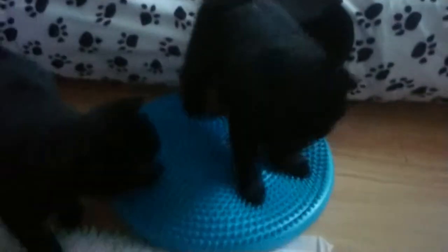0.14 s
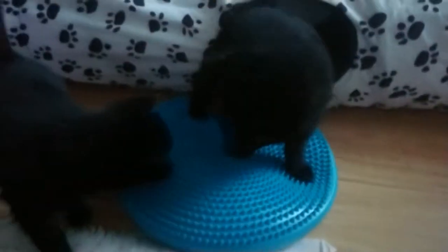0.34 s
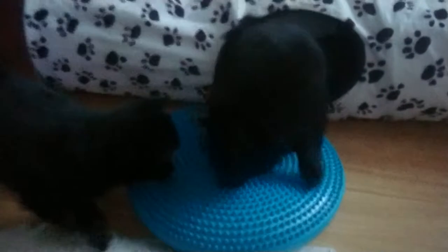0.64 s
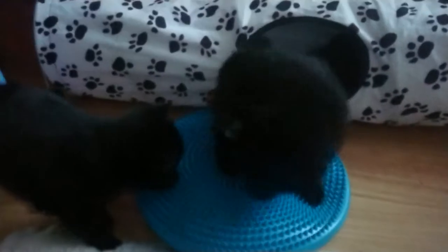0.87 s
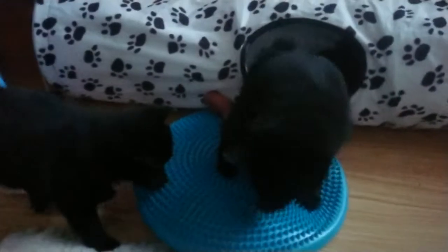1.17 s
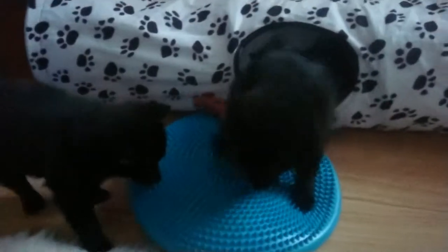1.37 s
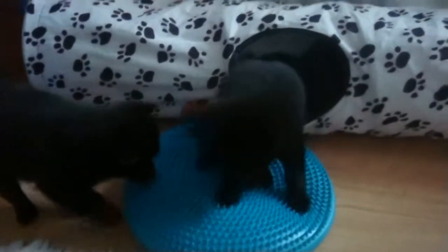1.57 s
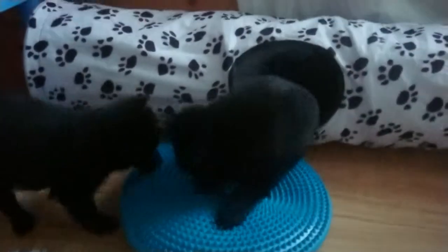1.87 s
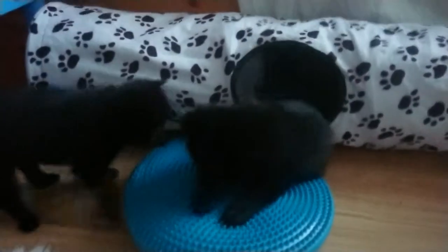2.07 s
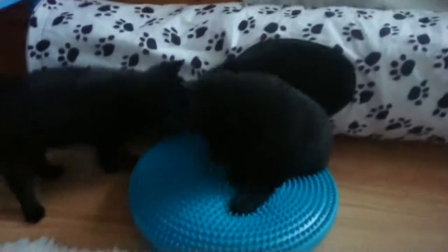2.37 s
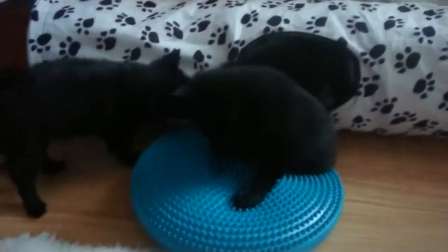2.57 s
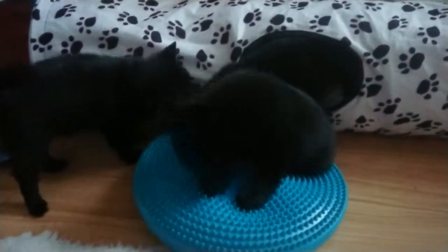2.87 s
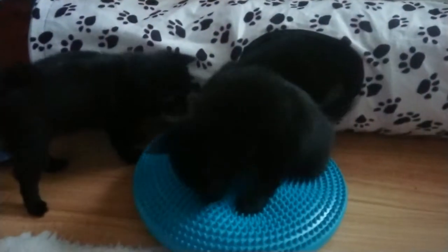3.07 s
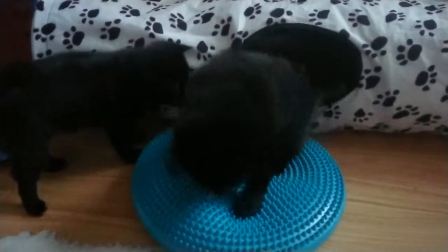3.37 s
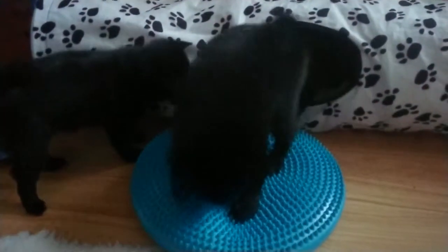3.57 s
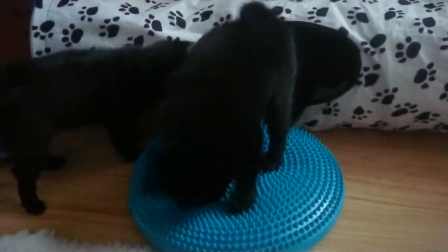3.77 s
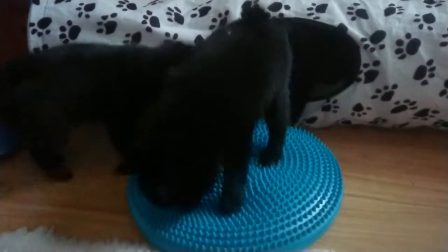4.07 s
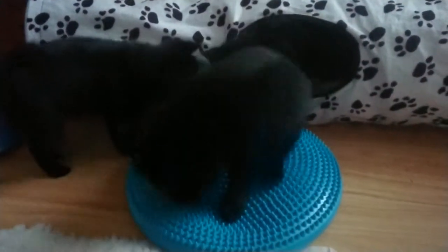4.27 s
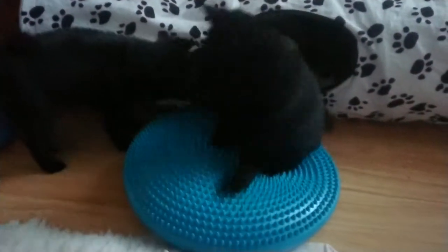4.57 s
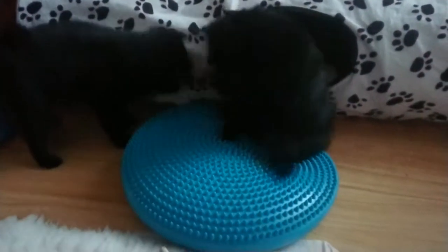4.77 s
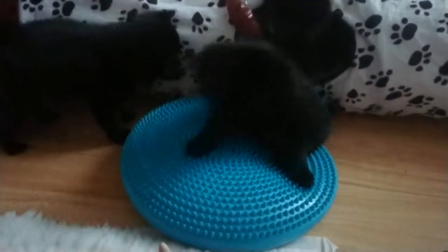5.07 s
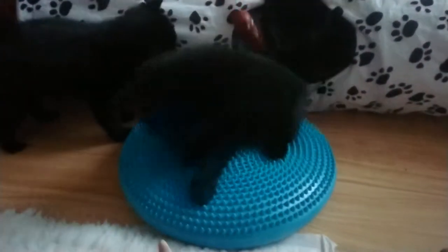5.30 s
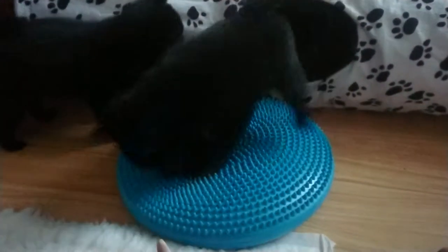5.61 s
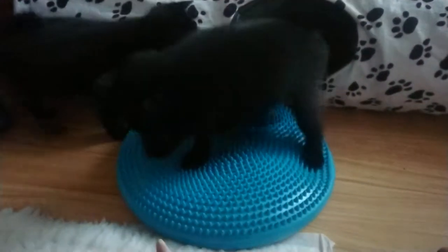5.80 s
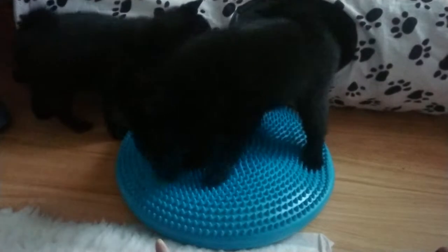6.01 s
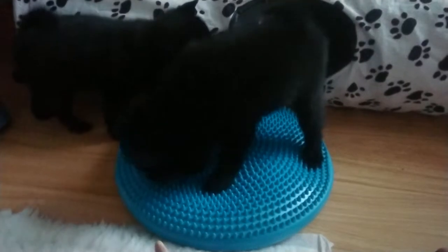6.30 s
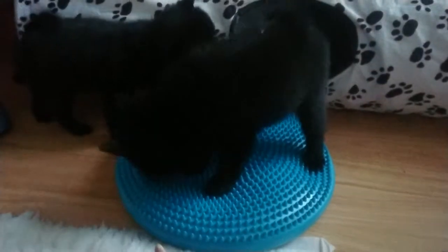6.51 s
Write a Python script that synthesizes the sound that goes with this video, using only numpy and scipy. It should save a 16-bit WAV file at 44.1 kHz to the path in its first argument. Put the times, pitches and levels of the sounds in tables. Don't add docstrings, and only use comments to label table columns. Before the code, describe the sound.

Small pets clamber over a studded rubber air cushion beside a crinkly fabric tunnel. Thin cloth rustles and crackles in uneven swells, with claw ticks and sharp crease snaps. Soft low bumps cluster between about one and two and a half seconds, then become sparser. A few tiny snuffles and a low wooden floor boom follow. Small, fairly dry room, close stereo phone microphone, quiet throughout.

```python
import sys
import numpy as np
from scipy import signal
from scipy.fft import rfft, irfft
from scipy.io import wavfile

SR = 44100
rng = np.random.default_rng(int(sys.argv[2]) if len(sys.argv) > 2 else 0)


def put_to_file(sound):
    columns = np.atleast_2d(sound).T
    safe = np.clip(columns, -1, 1)
    whole_steps = np.round(safe * 32767)
    wavfile.write(sys.argv[1], SR, whole_steps.astype(np.int16))


def volts_from_decibels(level):
    exponent = np.asarray(level, float) / 20
    return 10 ** exponent


N = 293265

# (time of peak [s], peak [dB], pitch [Hz])
BUMPS = [(1.228, -34, 264), (1.243, -29.5, 276), (1.292, -32, 230), (1.303, -26, 250), (1.642, -31, 226),
         (1.662, -34, 232), (1.697, -34, 200), (1.708, -31, 210), (1.8, -29, 212), (1.812, -31.5, 230),
         (1.88, -27, 200), (1.885, -29, 195), (1.889, -28, 200), (1.914, -29.5, 205), (1.92, -33, 190),
         (1.946, -29.5, 260), (1.965, -29, 288), (2.212, -30.5, 262), (2.314, -23, 270), (2.321, -31, 170),
         (2.328, -33, 190), (2.369, -33, 170), (2.439, -33, 260), (2.363, -25.5, 230), (2.404, -22.5, 243),
         (2.428, -26, 236), (2.509, -28, 196), (3.032, -27, 250), (3.054, -26.5, 287), (3.072, -34, 170),
         (3.455, -32.5, 232), (3.507, -31.5, 267), (5.197, -34.5, 150), (5.554, -29, 285),
         (5.722, -31, 285), (5.741, -35, 145)]
# (time of peak [s], peak [dB], pitch [Hz])
WEAKER_BUMPS = [(1.318, -39, 200), (1.329, -38, 202), (1.687, -38, 240), (1.828, -41, 170), (1.84, -39, 270),
                (2.071, -37, 320), (2.086, -37, 390), (2.294, -35, 250), (2.546, -39, 170), (2.567, -39, 161),
                (3.014, -39, 260), (3.082, -35.5, 212), (3.374, -36.5, 250), (3.41, -36, 266),
                (3.698, -37.5, 212), (3.875, -40, 190), (5.12, -40, 330), (5.149, -38, 330), (5.535, -35.5, 312),
                (5.587, -39, 282), (5.628, -37.5, 160), (5.641, -35, 298), (5.649, -36, 280), (5.678, -41, 240),
                (5.706, -37, 257), (5.753, -36, 203), (5.765, -35, 220), (5.801, -40, 170), (6.222, -42, 170)]
LEAN_S = .12
ROOM_T60_S, ROOM_DB = 0.17, -6.5


def rms_one(x):
    return x / np.sqrt(np.mean(x ** 2) + 1e-20)


def in_time(rows):
    s, *columns = np.transpose(rows)
    return [np.interp(np.arange(N) / SR, s, c) for c in columns]


def colour(x, points):
    hz = np.maximum(np.arange(2049) * SR / 4096, 1)
    point_hz, point_db = np.transpose(points)
    log_gain = np.interp(np.log(hz), np.log(point_hz), point_db) * np.log(10) / 20
    cepstrum = irfft(log_gain)[:2048] * np.r_[1, 2 * np.ones(2047)]
    impulse = irfft(np.exp(rfft(cepstrum, 4096)))
    return signal.fftconvolve(x, impulse)[:N]


def drift(rate_hz):
    r = np.exp(-80 * np.pi * rate_hz / SR)
    white = rng.standard_normal(N // 40 + 2002)
    slow = signal.lfilter([1], [1, -2 * r, r * r], white)[2000:]
    return np.interp(np.arange(N) / 40, np.arange(len(slow)), rms_one(slow))


def ring(clicks, hz, t60):
    r, w = volts_from_decibels(-60 / (t60 * SR)), 2 * np.pi * hz / SR
    return signal.lfilter([0, np.sin(w)], [1, -2 * r * np.cos(w), r * r], clicks + 1e-18)


def fade(x, tau_s):
    r = np.exp(-1 / (tau_s * SR))
    return signal.lfilter([1 - r], [1, -r], x + 1e-18)


def below(x, hz):
    return signal.sosfiltfilt(signal.butter(3, hz, fs=SR, output="sos"), x)


def swells(rows):
    t = np.arange(N // 40 + 1) * 40 / SR
    s, rise_s, fall_s, peak_db = np.transpose(rows)[..., None]
    drop_db = 10 * np.maximum((s - t) / rise_s, (t - s) / fall_s)
    power = volts_from_decibels(2 * (peak_db - drop_db)).sum(0)
    return np.interp(np.arange(N) / SR, t, power) + 1e-12


def add(out, s, sound):
    i = round(s * SR)
    out[..., i:i + sound.shape[-1]] += sound[..., :N - i]


def room(x):
    t = np.arange(SR // 2) / SR
    tails = rng.standard_normal((2, len(t))) * volts_from_decibels(-60 * t / ROOM_T60_S) * (t > .002)
    tails /= np.sqrt(np.sum(tails ** 2, axis=1, keepdims=True))
    return x + volts_from_decibels(ROOM_DB) * signal.fftconvolve(x, tails, axes=1)[:, :N]


def ports(x):
    # (frequency [Hz], gain [dB])
    port_left = [(650, -14), (800, -3.5), (1050, -6.5), (2050, 0), (3600, -4.5), (4500, -1.5), (5750, 2.5),
                 (6150, 1), (6500, -2.5), (8200, -2.5), (10600, -4.5), (11700, -12.5), (14000, -8),
                 (15650, -14.5)]
    port_right = [(650, -15.6), (800, -8.4), (1000, -12.4), (2050, -0.3), (3800, -4.7), (5000, -1.2),
                  (5600, -5.0), (6050, -14.9), (6550, -7.2), (9400, -4.7), (11400, -7.2), (13500, 0.9),
                  (14300, -0.3), (15650, -10.2)]
    left = colour(x[0], [(250, -31)] + port_left)
    right = colour(x[1], [(250, -35)] + port_right)
    right = .3 * right + .7 * signal.lfilter(*signal.iirnotch(6060, 18, SR), right)
    return np.array([left, right])


def movement():
    # (time [s], level [dB], brightness [dB])
    stir_rows = [(0.0, -48.9, -1.7), (0.09, -56.9, -8.9), (0.44, -55.8, -5.4), (0.98, -52.8, -3.0),
                 (1.35, -56.9, -3.8), (1.7, -47.5, -0.5), (2.05, -47.8, 0.8), (2.45, -45.5, -0.0),
                 (2.6, -55.1, -0.1), (3.09, -70.5, -5.9), (3.5, -58.5, 1.3), (3.77, -53.5, -1.9),
                 (3.83, -71.4, -3.1), (4.55, -70.0, -6.4), (4.83, -59.5, -15.1), (5.5, -52.3, -0.2),
                 (5.85, -59.6, -1.7), (6.65, -64.7, -3.2)]
    # (time of peak [s], rise [s per 10 dB], fall [s per 10 dB], peak [dB])
    brush_rows = [(0.039, 0.013, 0.017, -54.2), (0.207, 0.059, 0.032, -45.4), (0.33, 0.161, 0.197, -59.1),
                  (0.54, 0.063, 0.083, -49.8), (1.59, 0.076, 0.043, -40.1), (1.699, 0.067, 0.449, -45.0),
                  (1.841, 0.017, 0.103, -46.9), (2.08, 0.035, 0.287, -42.6), (2.861, 0.087, 0.104, -44.4),
                  (3.008, 0.056, 0.03, -48.6), (3.113, 0.014, 0.027, -50.3), (3.125, 0.009, 0.035, -55.8),
                  (3.384, 0.087, 0.05, -43.4), (3.653, 0.291, 0.069, -49.5), (3.904, 0.049, 0.103, -49.6),
                  (4.23, 0.066, 0.608, -58.5), (4.291, 0.058, 0.012, -52.9), (4.343, .009, .012, -51),
                  (4.383, .006, .025, -49), (4.455, .02, .008, -48), (4.608, 0.024, 0.065, -51.9),
                  (4.679, 0.028, 0.079, -53.3), (4.758, 0.074, 0.061, -45.4), (4.9, 0.022, 0.029, -47.0),
                  (5.139, 0.157, 0.067, -37.2), (5.288, 0.066, 0.115, -46.1), (5.46, 0.035, 0.055, -44.6),
                  (5.592, 0.311, 0.031, -45.5), (5.68, 0.142, 0.088, -40.9), (6.051, 0.304, 0.071, -47.8),
                  (6.118, 0.035, 0.067, -45.5), (6.379, 0.048, 0.794, -55.0), (6.636, 0.015, 0.192, -52.3)]
    # (time of peak [s], rise [s per 10 dB],
    # fall [s per 10 dB], peak [dB])
    drag_rows = [(0.777, 0.065, 0.105, -43.4), (0.868, 0.086, 0.038, -44.7), (1.051, 0.09, 0.016, -55.0),
                 (1.11, 0.038, 0.04, -47.3), (1.248, 0.305, 0.049, -48.9), (1.506, 0.151, 0.042, -47.3),
                 (1.919, 0.235, 0.14, -45.2), (2.179, 0.033, 0.044, -39.7), (2.347, 0.167, 0.126, -40.9),
                 (2.508, 0.02, 0.035, -42.8), (2.645, 0.047, 0.135, -48.5), (3.206, 0.18, 0.289, -51.7),
                 (3.278, 0.011, 0.533, -51.2), (3.76, 0.045, 0.028, -51.6), (4.049, 0.095, 0.035, -53.9),
                 (4.432, 0.089, 0.037, -50.5), (5.858, 0.027, 0.034, -45.4), (5.981, 0.024, 0.039, -50.3),
                 (6.221, 0.026, 0.055, -43.9), (6.533, 0.179, 0.037, -55.5)]
    stir_db, stir_bright_db = in_time(stir_rows)
    stir, brush, heavy = volts_from_decibels(2 * stir_db), swells(brush_rows), swells(drag_rows)
    power = stir + brush + heavy
    level_db = 10 * np.log10(power)
    move_bright_db = -1.05
    bright_db = (stir * stir_bright_db + (brush + heavy) * move_bright_db) / power
    drag = stir * volts_from_decibels(2 * -11.4) + brush * volts_from_decibels(2 * -5.9) + heavy * volts_from_decibels(2 * -2)
    drag_db = 10 * np.log10(drag)
    body_db = drag_db - 11.6 + .03 * (drag_db - drag_db.mean())
    return level_db, bright_db, drag_db, body_db


def weight():
    # (time [s], boom level [dB])
    tread_rows = [(0.0, -58), (.3, -56), (.65, -60), (.89, -56), (1.11, -61), (1.31, -50.5), (1.6, -58),
                  (1.81, -51), (1.93, -52), (2.4, -58), (2.84, -59), (3.09, -54), (3.43, -50), (3.54, -52),
                  (3.89, -56), (3.97, -60), (4.2, -62), (5.2, -45.5), (5.52, -53), (5.67, -51), (5.74, -41),
                  (6.22, -54), (6.32, -56), (6.4, -60)]
    # (time [s], rumble level [dB])
    rub_rows = [(.42, -64), (6.52, -63), (.95, -62), (3.25, -59), (3.63, -59), (3.88, -61), (4.44, -62),
                (5.26, -58), (5.5, -59), (5.92, -57), (6.12, -59), (6.35, -62)]
    rest_db, move_db, slip_db = -72, -8.8, -27
    slips = swells([(s, .01, .08, db + slip_db) for s, db, _ in BUMPS + WEAKER_BUMPS])
    rubs = swells([(s, LEAN_S, LEAN_S, db) for s, db in rub_rows])
    drags = volts_from_decibels(2 * (movement()[2] + move_db))
    rumble_power = volts_from_decibels(2 * rest_db) + drags + slips + rubs
    boom_power = swells([(s, .06, .06, db) for s, db in tread_rows]) + volts_from_decibels(2 * -75.)
    return 10 * np.log10(rumble_power), 10 * np.log10(boom_power)


def leaning(white):
    # (time [s], rumble level [dB])
    lean_rows = [(.03, -61), (.33, -58), (.46, -60), (1.42, -61), (2.65, -59), (3.97, -65), (4.22, -61),
                 (5.45, -60)]
    power = swells([(s, LEAN_S, LEAN_S, db) for s, db in lean_rows])
    return np.sqrt(power) * rms_one(ring(white, 150, .03))


def rumble():
    # (frequency [Hz], density [dB per Hz])
    rumble_colour = [(59, -31), (100, -1), (184, -3.5), (242, -3), (356, -3.5), (556, -7.5), (650, -20.5),
                     (840, -30), (1430, -120)]
    # (frequency [Hz], level [dB], T60 [s])
    low_modes = [
        (52.2, -68, 0.79),
        (80.6, 0.5, 0.24),
    ]
    rumble_db, boom_db = weight()
    white = rng.standard_normal((3, 2, N))
    noise = rms_one(np.array([colour(w, rumble_colour) for w in white[0]]))
    lumps = volts_from_decibels(rumble_db + 3.16 * drift(15)) * noise
    hum, boom = (volts_from_decibels(db) * rms_one(ring(w, hz, t60)) for w, (hz, db, t60) in zip(white[1:], low_modes))
    mid, side = lumps + leaning(white[0]) + hum + volts_from_decibels(boom_db) * boom
    return mid + .27 * side * np.array([[1], [-1]])


def knock():
    # (time [s], peak [dB])
    contact = [(6.206, -34.5)]
    # (frequency [Hz], level [dB], T60 [s])
    board_modes = [(170, -8.5, .1), (900, 1.5, 0.035), (807, -8, 0.12), (1260, -10, 0.034),
                   (1700, -14, 0.049), (2196, -8, .08), (2980, -20, 0.045)]
    click = np.zeros(N)
    s, peak_db = contact[0]
    click[round(s * SR)] = -volts_from_decibels(peak_db)
    return sum(volts_from_decibels(db) * ring(click, hz, t60) for hz, db, t60 in board_modes)


def snuffles():
    # (start [s], length [s], resonance at start [Hz], resonance at end [Hz],
    # level [dB])
    puffs = [(3.104, .06, 2100, 2100, -58), (3.155, .075, 2500, 2400, -56), (3.899, .075, 2050, 1900, -48),
             (4.035, 0.07, 1300, 1130, -58), (5.753, .065, 1950, 1550, -46.5),
             (5.84, 0.061, 1730, 1448, -45.5), (5.85, .035, 2410, 2260, -53)]
    out = np.zeros((2, N))
    for s, length, start_hz, end_hz, level_db in puffs:
        t = np.arange(round(length * SR)) / SR
        white = rng.standard_normal((2, 3, 4000))
        shared = white[:, :2] + 0.46 * white[:, 2:]
        slow = signal.lfilter([1], [1, -2 * .97, .97 ** 2], shared)[..., -len(t):]
        phase = 2 * np.pi * np.cumsum(start_hz + (end_hz - start_hz) * t / length) / SR
        air = rms_one(slow[0] * np.cos(phase) + slow[1] * np.sin(phase))
        flutter = 1 + .6 * np.cos(2 * np.pi * 92 * (t - .003))
        envelope = np.minimum(t / 0.0032, 1) * (1 - t / length) ** 0.76
        add(out, s, volts_from_decibels(level_db + 5) * air * flutter * envelope)
    return room(out)


def claws():
    # (time [s], peak [dB])
    catches = [(.0318, -40), (.1486, -41), (.262, -44), (.605, -43), (.7547, -32), (.851, -28), (1.04, -33),
               (1.058, -38), (1.352, -40), (1.485, -33), (1.503, -33), (1.65, -35), (1.9425, -34),
               (2.318, -32), (2.858, -38), (3.0525, -42), (3.08, -43), (3.41, -35), (3.534, -41),
               (3.9005, -33), (4.916, -40), (4.949, -40), (4.977, -40)]
    clicks = np.zeros(N)
    s, db = np.transpose(catches)
    clicks[(s * SR).astype(int)] = volts_from_decibels(db)
    return room(ring(clicks, 2000, .009) * np.ones((2, 1)))


def flicks():
    # (time [s], peak [dB], pitch [Hz])
    thin_edges = [(0.2123, -38, 13700), (0.2876, -42, 13500), (0.6049, -41, 13200), (0.7536, -36, 12700),
                  (0.8823, -34, 13400), (1.5343, -37, 14200), (1.5548, -32, 14100), (1.5717, -31, 13400),
                  (1.6181, -26, 14100), (1.7389, -30, 13800), (1.8606, -31, 13800), (1.881, -27, 14200),
                  (2.0162, -29, 13900), (2.0681, -32, 13800), (2.0921, -29, 14700), (2.1046, -29, 13700),
                  (2.4861, -34, 13500), (2.5729, -36, 13900), (2.769, -37, 14400), (2.832, -34, 13800),
                  (3.4355, -34, 13800), (3.5074, -38, 13600), (3.5203, -35, 14000), (3.5373, -35, 13900),
                  (3.5627, -33, 13900), (3.6166, -33, 14000), (3.6234, -36, 14100), (3.7288, -39, 12300),
                  (3.8446, -34, 13800), (3.8736, -24, 13000), (3.8816, -25, 13900), (3.8879, -35, 13100),
                  (3.9549, -40, 13800), (4.0592, -38, 13600), (4.2881, -32, 13600), (4.3924, -39, 13700),
                  (4.4212, -31, 14000), (4.4354, -38, 14900), (4.7086, -34, 13500), (4.745, -36, 13900),
                  (4.8907, -38, 13700), (4.955, -40, 14300), (5.0798, -33, 14800), (5.2359, -38, 14200),
                  (5.6235, -31, 13600), (5.667, -30, 13800), (5.833, -37, 13900), (5.9627, -39, 13800),
                  (6.123, -29, 14300), (6.2164, -35, 13700), (6.2224, -36, 13800), (6.6227, -41, 13800)]
    # (time [s], peak [dB], pitch [Hz])
    broad_edges = [(.0594, -44, 4500), (.4055, -45, 3500), (.4594, -41, 4200), (.5531, -42, 8000),
                   (1.68, -33, 6000), (1.739, -35, 10000), (1.755, -36, 5800), (1.838, -33, 5800),
                   (2.135, -35, 5800), (3.1117, -40, 5900), (3.6415, -36, 7770), (3.8745, -30, 5570),
                   (3.8884, -35, 5610), (4.5629, -44, 7760), (4.895, -38, 7500)]
    releases = thin_edges + broad_edges
    out, t = np.zeros((2, N)), np.arange(400) / SR
    width = .15
    for s, peak_db, hz in releases:
        burst = rng.standard_normal((2, len(t))) * np.exp(-t / .0007)
        band = [hz * (1 - width), min(hz * (1 + width), .45 * SR)]
        spit = signal.sosfilt(signal.butter(1, band, "band", fs=SR, output="sos"), burst)
        add(out, s, volts_from_decibels(peak_db + 10) * spit / np.abs(spit).max())
    return ports(room(out))


def bumps():
    # (frequency [Hz], level [dB], T60 [s])
    cushion_modes = [(81.5, -10, 0.087), (147.2, -9.5, 0.1), (250, -19.5, 0.063), (364.7, -15, 0.21)]
    # (frequency [Hz], level [dB], T60 [s])
    shell = (790, -23.5, 0.043)
    out, taps = np.zeros(N), np.zeros(N)
    slips = BUMPS + WEAKER_BUMPS
    for s, peak_db, hz in slips:
        turns = np.arange(-300, 1200) / SR * hz
        late = np.maximum(turns, 0)
        swing = turns - 0.37 * late ** 2 / (1 + late) - .15 * np.minimum(turns, 0) ** 2
        shape = np.where(turns < 0, np.exp(-(turns / .5) ** 2), np.exp(-(late / .85) ** 1.3))
        add(out, s - 300 / SR, -volts_from_decibels(peak_db) * np.cos(2 * np.pi * swing) * shape)
        taps[round((s - .002) * SR)] = volts_from_decibels(peak_db + shell[1])
    out -= below(out, 64)
    rung = sum(volts_from_decibels(db - 38) * ring(out, hz, t60) for hz, db, t60 in cushion_modes)
    return out + rung + ring(taps, shell[0], shell[2])


def snaps():
    # (time [s], peak [dB], brightness [dB])
    snapping_folds = [(0.0316, -27.5, -22), (0.1271, -36, -14), (0.4603, -37, -21), (0.5273, -29, -9),
                      (0.553, -34, -16), (0.85, -18.5, -15), (0.8654, -27, -16), (1.6788, -31, -30),
                      (1.8361, -30, -20), (3.3732, -29, -5.5), (3.6427, -25, -15), (3.8452, -42, -5),
                      (3.8674, -37, -8), (3.8722, -21, -24), (3.889, -31, -24), (4.2416, -33, -18),
                      (4.2712, -32, -22), (4.289, -33, -16), (4.4362, -33, -17), (4.5617, -52, -3),
                      (5.3852, -41, 4), (5.4634, -23, -10), (5.836, -29, -22), (6.1265, -25, -8.5),
                      (6.2095, -29, -16), (6.3724, -30.5, -21), (6.6228, -39, -17), (6.6434, -33, -31)]
    # (time [s], peak [dB])
    further_folds = [(.2107, -39), (2.7328, -29.5), (3.4357, -25), (3.5613, -34), (3.7758, -29),
                     (3.8744, -23), (3.8784, -29), (3.882, -33), (3.9277, -29.5), (4.0586, -36),
                     (4.0904, -38), (4.13, -39), (4.1998, -36), (4.4226, -33), (4.5042, -40), (4.5907, -30.5),
                     (4.6177, -36), (4.8487, -36), (5.2804, -28.5), (5.2974, -27.5), (5.4525, -26),
                     (5.851, -31)]
    out, t = np.zeros((2, N)), np.arange(2000) / SR
    folds = snapping_folds + [(s, db, -12) for s, db in further_folds]
    treble = signal.butter(2, 9000, "high", fs=SR, output="sos")
    envelope = np.minimum(t / .0003, 1) * (np.exp(-t / .0007) + .11 * np.exp(-t / .009))
    for s, peak_db, bright_db in folds:
        crack = rng.standard_normal((2, len(t))) * envelope
        top = signal.sosfilt(treble, crack)
        add(out, s, volts_from_decibels(peak_db + 6) * (crack + (volts_from_decibels(bright_db + 13) - 1) * top))
    return ports(room(out))


def creases(level, per_s, spread_db, clump_db, smear_s):
    born = rng.random(N) < per_s * volts_from_decibels(clump_db * drift(25)) / SR
    power = born * volts_from_decibels(2 * spread_db * np.minimum(rng.exponential(1, N), 5))
    smeared = fade(fade(power, smear_s), smear_s)
    power = level ** 2 * (smeared / power.mean() + 0.44)
    wash = volts_from_decibels(2 * -7.) * fade(power, ROOM_T60_S / np.log(1e6))
    return np.sqrt(power + wash) * rng.standard_normal((2, N))


def rustle():
    # (time [s], left minus right [dB])
    place = [(0.0, 5.5), (0.7, -0.5), (1.31, -0.5), (1.67, -0.5), (2.68, -1), (3.67, 2.0), (3.91, -2),
             (5.0, 0), (5.87, -1), (6.11, 1.5), (6.45, -1.5), (6.65, 1)]
    splits_hz = 1150, 2750, 9500
    level_db, bright_db, drag_db, body_db = movement()
    pan_db = in_time(place)[0]
    level = volts_from_decibels(level_db + 0.4 * drift(14.0))
    heard = ports(creases(level, 1500, spread_db=3.5, clump_db=3.5, smear_s=0.00054))
    fine = ports(creases(level, 500, spread_db=4.5, clump_db=4.0, smear_s=0.00015))
    coarse = ports(creases(level, 500, spread_db=4.0, clump_db=3.5, smear_s=.001))
    body, to_drag, to_middle = (below(heard, hz) for hz in splits_hz)
    coarse_drag = below(coarse, splits_hz[1]) - below(coarse, splits_hz[0])
    drag = (to_drag - body + coarse_drag) / np.sqrt(2)
    middle = (to_middle - to_drag) * volts_from_decibels(0.6 * drift(20.0))
    top = 0.45 * (heard - to_middle) + 0.67 * (fine - below(fine, splits_hz[2]))
    body = .45 * body + .75 * body.mean(0)
    drag = .8 * drag + .3 * drag.mean(0)
    low = volts_from_decibels(drag_db - level_db + 4.5) * drag + volts_from_decibels(body_db - level_db + 14.5) * body
    mix = middle + volts_from_decibels(bright_db + 2.4 + 1.1 * drift(20.0)) * top + low
    return volts_from_decibels(10) * mix * volts_from_decibels(np.array([pan_db, -pan_db]) / 2)


def scene():
    low = (bumps() + rumble() + knock()) * volts_from_decibels([[1.7], [-1.7]])
    low[0] = np.roll(low[0], 2)
    return rustle() + snaps() + snuffles() + claws() + flicks() + low


def low_pass(x):
    return signal.sosfilt(signal.butter(12, 16490, fs=SR, output="sos"), x)


def record(dry):
    cut = signal.sosfilt(signal.butter(6, 42, "high", fs=SR, output="sos"), dry)
    cut = signal.sosfilt(signal.ellip(10, .5, 70, 15800, fs=SR, output="sos"), cut)
    return low_pass(cut)


dry = scene()
out = record(dry)
put_to_file(out)
```